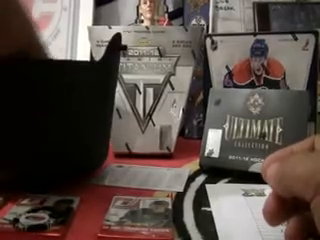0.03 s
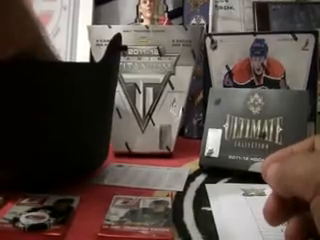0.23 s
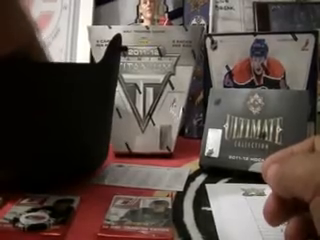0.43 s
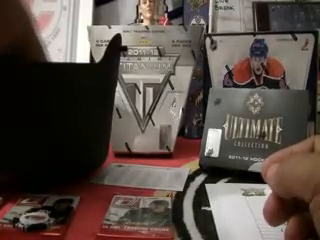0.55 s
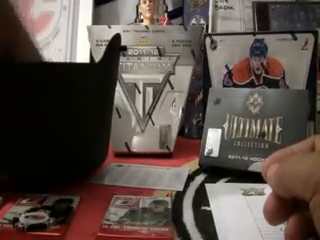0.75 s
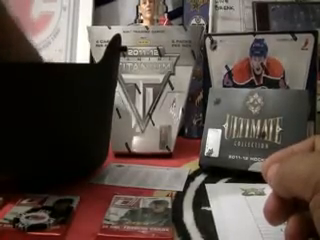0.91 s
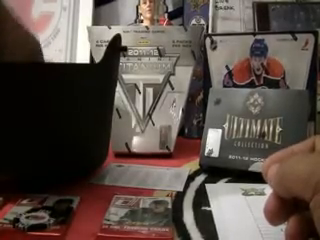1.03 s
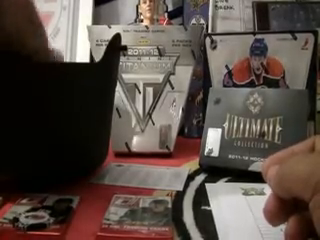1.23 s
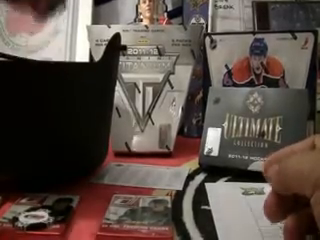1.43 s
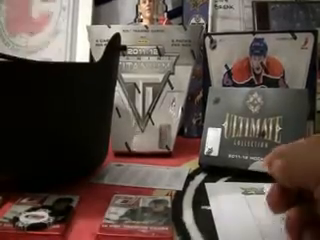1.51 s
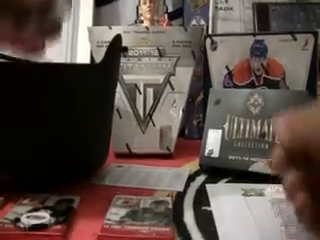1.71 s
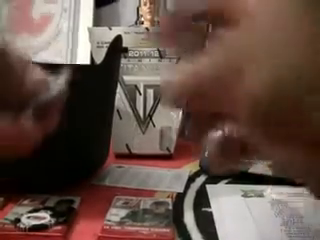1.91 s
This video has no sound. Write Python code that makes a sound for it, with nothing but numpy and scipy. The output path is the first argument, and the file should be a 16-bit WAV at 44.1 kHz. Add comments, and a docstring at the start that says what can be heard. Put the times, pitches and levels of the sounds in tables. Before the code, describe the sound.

Plastic chips knock together in a stiff cloth bag, close and right of centre in a small room. Soft clicks from 0.04 seconds thicken after 0.3, peak near 0.43, and continue in bursts with small rattles and dull cloth murmur until about 0.75. A short ring fades into low room hum. One barely audible tick comes at 1.1; a faint cloth brush and ticks follow around 1.65-1.8.

```python
"""Plastic chips knock together in surges as a hand stirs them in a stiff cloth bag near a camera, then stop.
Each knock is a noise crack plus short decaying modes of the heap, with echoes and ringing of a small room.
Smaller chips jostle in between as many weak contacts; the bag wall murmurs as band-limited noise.
Later one chip settles, the hand brushes the cloth on its way out (shaped noise) and a few more chips tick.
Behind it lies quiet room air, low-weighted noise with wavering drones."""
import sys
import numpy as np
from scipy import signal
from scipy.fft import rfft, irfft, next_fast_len
from scipy.io import wavfile
from scipy.ndimage import map_coordinates

SR = 44100
rng = np.random.default_rng(int(sys.argv[2]) if len(sys.argv) > 2 else 0)


def wrap_up_sound(samples):
    """Save the sound to the file named by the first command line argument, as 16-bit audio."""
    columns = np.atleast_2d(samples).T
    # keep every value between -1 and 1, then stretch to whole-number steps
    tamed = np.clip(columns, -1, 1)
    steps = np.round(tamed * 32767).astype(np.int16)
    wavfile.write(sys.argv[1], SR, steps)


N = 85995


def amp(db):
    """Decibels to linear gain."""
    return 10 ** (np.asarray(db) / 20)


def unit(x):
    """Scale to an RMS of 1."""
    return x / np.sqrt(np.mean(x ** 2) + 1e-20)


def decay(t_s, t60_s):
    """Exponential decay that falls 60 dB in t60_s."""
    return np.exp(-np.log(1000) * t_s / t60_s)


def along(points, hz):
    """Interpolate (pitch_hz, value) points on a log frequency axis."""
    point_hz, value = np.transpose(points)
    return np.interp(np.log(hz + 1), np.log(point_hz + 1), value)


def envelope(points):
    """Gain over the whole scene from (time_s, level_db) points."""
    return amp(np.interp(np.arange(N) / SR, *np.transpose(points)))


def filtered(x, response):
    """Multiply the spectrum of x by a response of frequency."""
    n = x.shape[-1]
    padded = next_fast_len(n + 4096)
    spectrum = rfft(x, padded) * response(np.fft.rfftfreq(padded, 1 / SR))
    return irfft(spectrum, padded)[..., :n]


def add(track, start_s, sound):
    """Mix a sound into the track at start_s."""
    part = track[..., max(0, round(start_s * SR)):][..., :sound.shape[-1]]
    part += sound[..., :part.shape[-1]]


def mid_side_to_stereo(mid, side, width):
    """Left and right from mid and side, the side weighted by width."""
    side = filtered(side, lambda hz: amp(along(width, hz)))
    return np.array([mid + side, mid - side])


def stereo_noise(width, size):
    """White noise in two channels, as wide as the side level allows."""
    mid, side = rng.standard_normal((2, size))
    return mid_side_to_stereo(mid, side, width)


# chip knocks: start_s, level_db, body_db, clack_db, edge_db
CHIP_KNOCKS = [(0.0399,-35.5,-9,1,-6), (.049,-39.5,4.5,9.5,-24), (0.0707,-31.5,-10.5,0,-40),
               (.089,-43.5,9.5,2,-26), (.138,-27,7.5,-3.5,-34), (0.1478,-37.5,8,3.5,-5.5),
               (0.2022,-33,10,5.5,-3), (.21,-38,6.5,12.5,-2.5), (.221,-30.5,11,4.5,-2.5),
               (.229,-33.5,11.5,10,-3), (.243,-37.5,9.5,7,-8.5), (0.2544,-34,13,-6.5,-15.5),
               (0.3249,-24,8,2.5,-7), (.3325,-26.5,1,1,-11), (.341,-27,-5.5,-3.5,-5.5),
               (.345,-32.5,-9,8,-12.5), (.3628,-19.5,-1.5,-6,-11), (.373,-25.5,-7.5,0.5,-7.5),
               (.38,-21,-12,-12,-14), (.384,-28,2.5,10.5,-3), (.391,-35.5,7,13,7), (.423,-24,4,8.5,3.5),
               (0.4279,-13,6.5,-4,1), (0.4298,-22.5,-2.5,0.5,-8.5), (0.4372,-18.5,-1.5,0.5,0.5),
               (.4441,-23,8.5,6.5,3.5), (.453,-23,7,2,-7.5), (0.4615,-16.5,-8.5,-0.5,-2),
               (0.4668,-24.5,-4,-6.5,5.5), (.471,-28,-8,5.5,-0.5), (.4775,-27,0.5,-1,-7),
               (.4885,-17,6,0.5,-21.5), (.502,-26,-5.5,3.5,-7.5), (0.5479,-21.5,5,-0.5,-6),
               (.5557,-26.5,-3.5,7,0), (.562,-20,-11.5,5.5,0.5), (.571,-29,-3.5,11.5,-5.5),
               (0.5784,-24.5,-12,2,-6), (0.6498,-26.5,8,2,-6), (.653,-30.5,-2,13.5,-3.5),
               (0.661,-35,5,9,6.5), (.69,-26.5,2,-7,4.5), (.698,-23.5,2.5,-0.5,-13.5),
               (.7011,-17,-7,-11,13), (.703,-17,-9.5,-0.5,2.5), (.7093,-32.5,5.5,8,6.5),
               (0.73,-32.5,0,5,-13.5), (0.7394,-29.5,0.5,3,11.5), (.748,-39.5,-3,6,-6.5),
               (1.12,-60.5,4.5,-3,4), (1.696,-62,-5,8.5,11), (1.765,-51,1.5,-3.5,-1), (1.776,-57.5,2,1,-3)]
# room resonances woken by a knock: pitch_hz, level_db, t60_s
ROOM_RESONANCES = [(257.8, -35.5, 0.54), (275.6, -32, .3), (555, -17.5, .22), (680, -26, 0.25),
                   (950, -26.5, 0.15), (1060, -23.5, 0.16), (1145, -24.5, 0.12), (1760, -25.5, 0.18)]


def clacks():
    """Distinct chip knocks; each also wakes a few long room resonances."""
    out = np.zeros((2, N))
    t = np.arange(SR // 3) / SR
    for start_s, level_db, body_db, clack_db, edge_db in CHIP_KNOCKS:
        knock = contact(body_db, clack_db, edge_db)
        add(out, start_s, amp(level_db) * in_room(knock))
        colour = [(BODY_HZ, body_db), (MIDDLE_HZ, 0), (CLACK_HZ, clack_db)]
        ring = np.zeros(len(t))
        for hz, mode_db, t60_s in ROOM_RESONANCES:
            tone = np.sin(2 * np.pi * (hz * t + rng.random()))
            ring += amp(mode_db + along(colour, hz)) * tone * decay(t, t60_s)
        swell = 1 - np.exp(-t / DESK_DELAY_S)
        add(out, start_s, amp(level_db) * ring * swell)
    return out


BODY_HZ, MIDDLE_HZ, CLACK_HZ, EDGE_HZ = 549, 1010, 1890, 7660  # anchors of the colour curve
DETUNE_LOG, MODE_SCATTER_DB = 0.047, 2  # standard deviations per contact
RISE_CYCLES = 0.19  # time constant of each mode's swell
CRACK_DB, CRACK_T60_S = -10, 0.0096  # crack level before colouring
CRACK_HZ, CRACK_DB_PER_OCTAVE = 5960, 10  # a stronger edge extends the crack upward
# modes of the heap in its bag, before colour and scatter: pitch_hz, level_db, t60_s
HEAP_MODES = [(135, -33, 0.056), (290, -20, 0.023), (562, -2.5, 0.01), (666.5, -2, 0.022), (966, 2, 0.012),
              (1116, 2, .011), (1791, -2.5, 0.011), (2344, -8, .009), (2825, -9.5, 0.008),
              (4270, -10, 0.0031), (6706, -18.5, .01), (7060, -25, 0.016), (9984, -20.5, 0.0033)]


def contact(body_db, clack_db, edge_db, size=2048):
    """One chip hits another: a scraping crack and the heap's short ring, varied each time."""
    t = np.arange(size) / SR
    hz, mode_db, t60_s = np.transpose(HEAP_MODES)
    colour = [(BODY_HZ, body_db), (MIDDLE_HZ, 0), (CLACK_HZ, clack_db), (EDGE_HZ, edge_db)]
    mode_db = mode_db + along(colour, hz) + MODE_SCATTER_DB * rng.standard_normal(len(hz))
    hz = hz * np.exp(DETUNE_LOG * rng.standard_normal(len(hz)))
    modes = np.sin(2 * np.pi * hz[:, None] * t) * decay(t, t60_s[:, None])
    modes *= 1 - np.exp(-hz[:, None] * t / RISE_CYCLES)
    polarity = (-1) ** np.arange(len(hz))
    ring = (amp(mode_db) * polarity) @ modes

    burst = rng.standard_normal(size) * decay(t, CRACK_T60_S)
    top_hz = CRACK_HZ * 2 ** (edge_db / CRACK_DB_PER_OCTAVE)
    top_hz = np.clip(top_hz, 2 * MIDDLE_HZ, SR / 3)
    band = signal.butter(2, [MIDDLE_HZ, top_hz], "band", fs=SR)
    crack = amp(CRACK_DB + (clack_db + edge_db) / 2) * signal.lfilter(*band, burst)
    return 2 * (ring + crack)


ECHOES_PER_S = 650
DESK_DB, DESK_DELAY_S, DESK_T60_S = 1.5, .002, .036  # early echoes off the desk and boxes
# decay of the tail: pitch_hz, t60_s
TAIL_DECAY = [(150, 0.28), (400, 0.35), (1000, 0.2), (2800, 0.22), (7000, 0.21), (11000, 0.21)]
# spectrum of the tail: pitch_hz, level_db
TAIL_SPECTRUM = [(120, -5), (500, -7), (1100, -5), (2000, -2.5), (4000, -1.5), (8000, 3.5)]
# stereo width of the echoes and bag wall: pitch_hz, side_db
ECHO_WIDTH = [(100, -9.5), (1000, -23), (3000, -10), (8000, -8)]


def in_room(x, size=16384):
    """Direct sound, separate near echoes and a tail whose decay depends on frequency."""
    hz, frame_s, bins = signal.stft(stereo_noise(ECHO_WIDTH, size), SR, nperseg=256)
    bins = bins * decay(frame_s, along(TAIL_DECAY, hz)[:, None])
    tail = signal.istft(bins, SR, nperseg=256)[1][:, :size]
    tail = filtered(tail / np.linalg.norm(tail[0]), lambda f: amp(along(TAIL_SPECTRUM, f)))

    t = np.arange(size) / SR
    signs = rng.choice([-1, 1], (2, size))
    hits = rng.random((2, size)) < ECHOES_PER_S / SR
    mid, side = signs * hits * decay(t, DESK_T60_S)
    near = mid_side_to_stereo(mid, side, ECHO_WIDTH) / np.linalg.norm(mid)

    onset = 1 - np.exp(-(t / DESK_DELAY_S) ** 2)
    response = (tail + amp(DESK_DB) * near) * onset
    response[:, 0] = 1  # direct sound
    return signal.fftconvolve(x[None], response, axes=1)


JOSTLES_PER_S, JOSTLE_SCATTER_DB = 280, 3
# colour of the small contacts: body_db, clack_db, edge_db
JOSTLE_COLOUR = (10.5, 1, -3.5)
# level of the small chips shifting: time_s, level_db
STIR_LEVEL = [(0.022, -58.5), (.07, -49), (.22, -48.5), (.3, -50), (.345, -39.5), (.45, -46),
              (0.522, -40.5), (.63, -56), (0.681, -43.5), (.75, -45.5), (.8, -72)]


def jostle():
    """Small chips slip and touch at jittered times while the hand stirs."""
    out = np.zeros((2, N))
    time_s, level_db = np.transpose(STIR_LEVEL)
    count = int(JOSTLES_PER_S / 10)
    for start_s in np.arange(0, time_s[-1], 1 / 10):  # each batch shares one room response
        batch = np.zeros(SR // 6)
        offsets_s = (np.arange(count) + rng.random(count)) / JOSTLES_PER_S
        for offset_s in offsets_s:
            touch_db = np.interp(start_s + offset_s, time_s, level_db)
            touch_db += JOSTLE_SCATTER_DB * rng.standard_normal()
            add(batch, offset_s, amp(touch_db) * contact(*JOSTLE_COLOUR))
        add(out, start_s, in_room(batch))
    return out


FLEX_LOW_HZ, FLEX_HIGH_HZ = 109.6, 318
# bag wall flexing against the hand: time_s, level_db
FLEX_LEVEL = [(0, -60), (.17, -44.5), (.3, -52.5), (.44, -41.5), (.55, -48.5), (.62, -73.5)]


def bag_wall():
    """Stiff cloth gives a dull murmur, band-limited noise, as the hand pushes against it."""
    def band(hz):
        return (1 + (FLEX_LOW_HZ / (hz + 1)) ** 8 + (hz / FLEX_HIGH_HZ) ** 8) ** -.5

    murmur = unit(filtered(stereo_noise(ECHO_WIDTH, N), band))
    first_second = np.arange(N) < SR
    return murmur * envelope(FLEX_LEVEL) * first_second


# hand on the cloth: time_s, level_db
BRUSH_LEVEL = [(1.58, -74.5), (1.659, -58.5), (1.7, -61.5), (1.725, -60.5), (1.764, -51), (1.808, -66.5),
               (1.871, -65), (1.94, -64.5)]
# spectrum of the rubbed cloth: pitch_hz, level_db
CLOTH_SPECTRUM = [(100, -13), (300, -1), (900, -5), (2000, -17), (5000, -18), (9500, -14.5), (13000, -29.5)]
# stereo width of brush and air: pitch_hz, side_db
BACKGROUND_WIDTH = [(30, -35), (120, -0.5), (1000, 1), (6000, -3)]


def brush():
    """The hand slides out along the cloth: friction as shaped noise."""
    noise = stereo_noise(BACKGROUND_WIDTH, N)
    rub = unit(filtered(noise, lambda hz: amp(along(CLOTH_SPECTRUM, hz))))
    return rub * envelope(BRUSH_LEVEL)


AIR_DB = -57  # RMS
# spectrum of the room air: pitch_hz, level_db
AIR_SPECTRUM = [(12, -38), (20, -4), (107, -3.5), (244, -5.5), (336, -9), (475, -10), (1750, -20.5),
                (11600, -35.5)]
# narrow room drones: pitch_hz, level_db
DRONES = [(163, -68), (177, -70.5), (257, -86.5), (333, -76)]


def room_tone(waver_per_s=7):
    """Quiet air noise plus drones, each a carrier wavering in level and phase."""
    t = np.arange(N) / SR
    noise = stereo_noise(BACKGROUND_WIDTH, N)
    out = amp(AIR_DB) * unit(filtered(noise, lambda hz: amp(along(AIR_SPECTRUM, hz))))

    def wobble():
        return map_coordinates(rng.standard_normal(size=64), [t * waver_per_s])

    for hz, level_db in DRONES:
        carrier = np.exp(2j * np.pi * hz * t)
        drone = np.real((wobble() + 1j * wobble()) * carrier)
        out = out + amp(level_db) * unit(drone)
    return out


CHIP_LOW_HZ, CHIP_TOP_HZ = 101, 10100  # chips and bag carry nothing below the low limit
# stereo balance of the chips and bag: pitch_hz, left_minus_right_db
CHIP_BALANCE = [(110, 1.5), (190, -1.5), (340, -7), (610, -9), (1090, -5), (2000, -3.5), (6500, -4.5),
                (9500, 0)]


def scene():
    """Chips and bag, band-limited and mostly right of centre, over brush and room tone."""
    def place(hz):
        balance = amp(along(CHIP_BALANCE, hz) * np.array([[.5], [-.5]]))
        return balance / np.sqrt(1 + (hz / CHIP_TOP_HZ) ** 60)

    high_pass = signal.butter(4, CHIP_LOW_HZ, "high", fs=SR, output="sos")
    bag = signal.sosfilt(high_pass, clacks() + jostle() + bag_wall())
    return filtered(bag, place) + brush() + room_tone()


OVERLOAD, TOP_HZ = .85, 12000  # peak ceiling of full scale, band limit


def record(dry):
    """The camera rounds off the highest peaks, then keeps nothing above its band limit."""
    rounded = dry / (1 + (dry / OVERLOAD) ** 8) ** (1 / 8)
    return filtered(rounded, lambda hz: hz < TOP_HZ)


dry = scene()
out = record(dry)
wrap_up_sound(out)
```